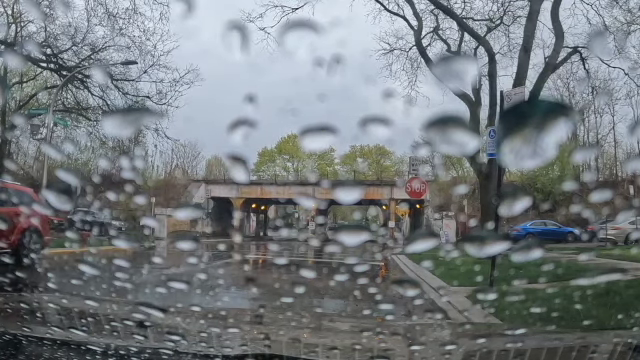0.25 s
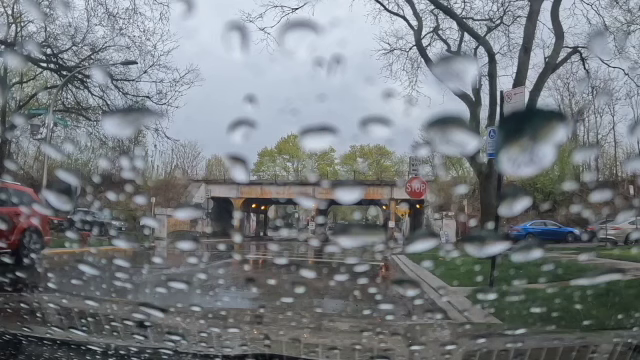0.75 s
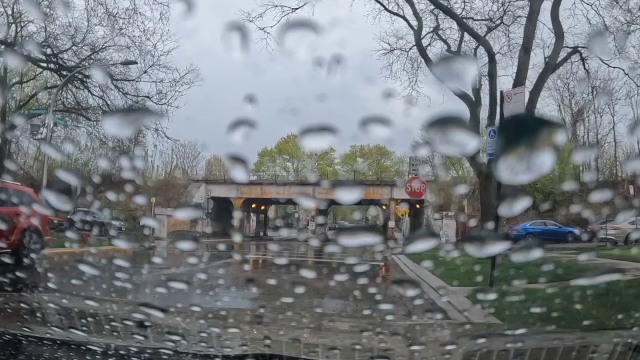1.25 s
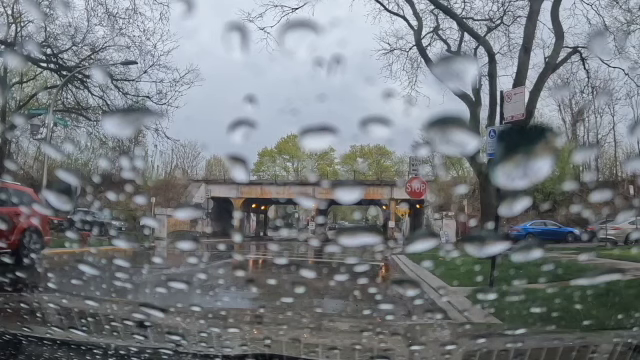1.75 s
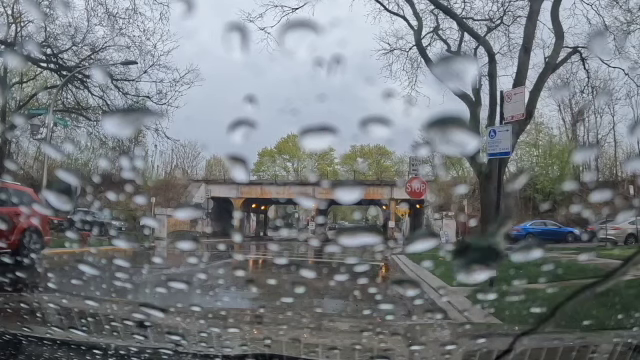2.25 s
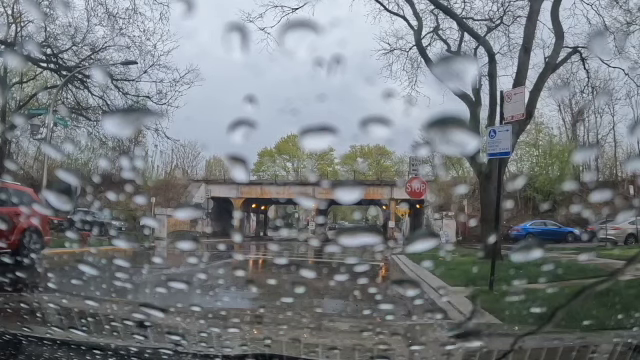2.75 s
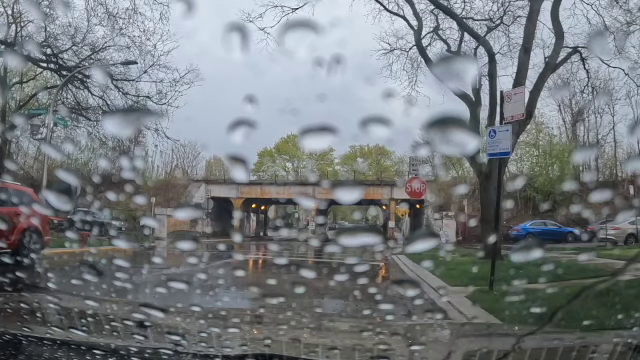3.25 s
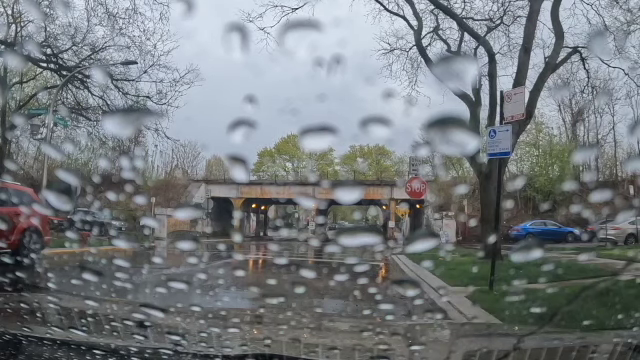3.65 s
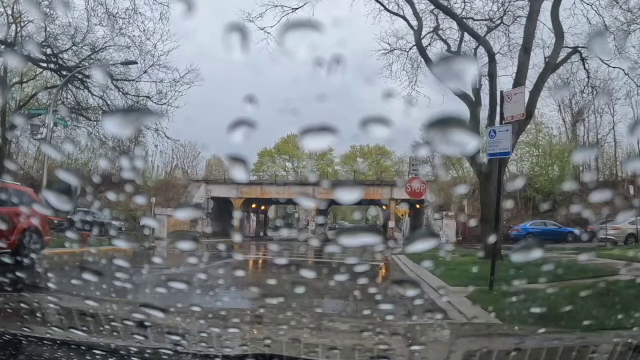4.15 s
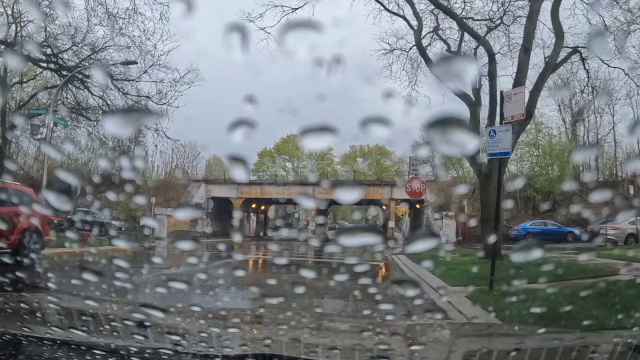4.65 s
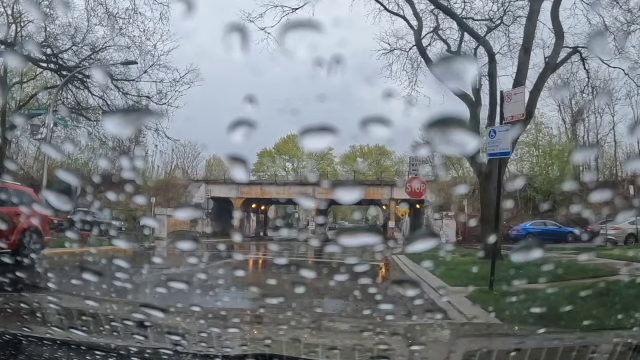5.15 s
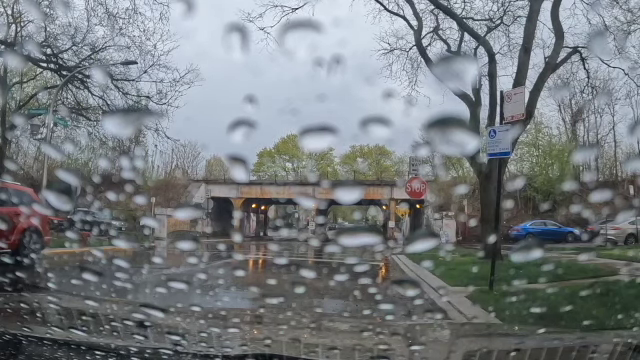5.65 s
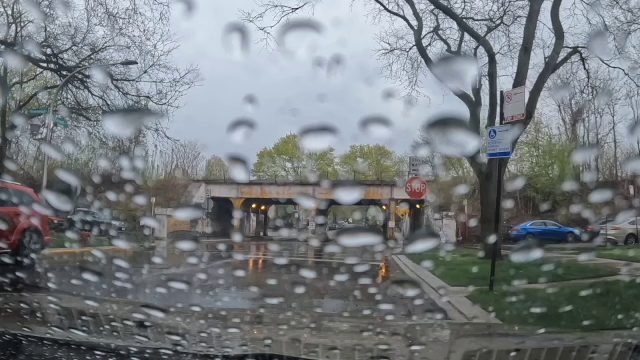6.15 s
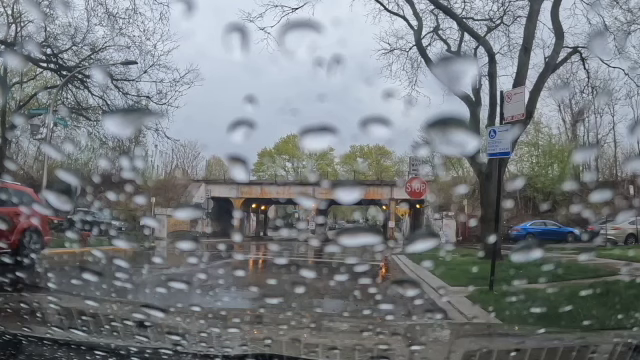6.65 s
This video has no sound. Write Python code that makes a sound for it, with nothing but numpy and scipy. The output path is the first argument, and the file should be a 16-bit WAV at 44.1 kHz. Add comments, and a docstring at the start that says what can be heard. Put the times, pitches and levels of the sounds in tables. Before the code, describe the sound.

Rain patters steadily on a parked car, with separate drops ticking on the windshield and thumping the roof at irregular intervals. A faint hiss of tyres on the wet road fades early. One hard drop hits just after the start and another past the middle, with a few splattering drips and short hollow notes. Distant traffic rumbles throughout, swelling into a brief low boom near the end. A stereo microphone pair listens inside the closed cabin.

```python
"""Rain on a parked car, from a stereo microphone pair inside the closed cabin. From the start the far street
rumbles, small drops merge into a patter and a passing car's tyre hiss fades, gone within two seconds.
Heavy drops soon thump the roof sheet overhead, knock the glass and tick as they burst; the hardest dent
the roof. Big drips from a tree splatter over some hundredths of a second, and a few hollow notes sound.
Near the end the cabin air booms once on a low note. The microphones hiss faintly throughout."""
import sys
import numpy as np
from scipy import signal
from scipy.fft import rfft, irfft, next_fast_len
from scipy.io import wavfile
from scipy.ndimage import uniform_filter1d, map_coordinates

SR = 44100
rng = np.random.default_rng(int(sys.argv[2]) if len(sys.argv) > 2 else 0)


def store_wav(level_fs):
    """Save 16-bit WAV to argv[1]."""
    pcm = np.round(np.clip(np.atleast_2d(level_fs), -1, 1) * 32767)
    wavfile.write(sys.argv[1], SR, pcm.T.astype(np.int16))


N = 305172


def amp(db):
    return 10 ** (np.asarray(db) / 20)

def curves(rows):
    """One value per sample for each column after the time."""
    times, *columns = np.transpose(rows)
    return [np.interp(np.arange(N) / SR, times, column) for column in columns]

def wobble(per_s):
    """A smooth random curve with per_s knots a second."""
    return map_coordinates(rng.standard_normal(int(N * per_s / SR) + 4), [np.arange(N) * per_s / SR])

def filtered(x, response):
    """x shaped by a complex response of frequency."""
    size = next_fast_len(N + SR // 2)
    return irfft(rfft(x, size) * response(np.fft.rfftfreq(size, 1 / SR)), size)[..., :N]

def resonant(modes, skirt):
    """Resonances under one wide band-pass that steepens the skirts; white noise keeps its rms."""
    low, high = modes[0][0] / skirt, modes[-1][0] * skirt

    def response(f):
        peaks = sum((-1) ** k * amp(db) * 1j * f * width / (hz * hz - f * f + 1j * f * width)
                    for k, (hz, width, db) in enumerate(modes))
        peaks = peaks / (1 + 1j * f / high) ** 2 / (1 + low / (1j * f + 1e-9)) ** 2
        return peaks / np.sqrt(np.mean(np.abs(peaks) ** 2))
    return response

def noise_pair(modes, skirt):
    """Two unrelated noises through the same resonances."""
    return filtered(rng.standard_normal((2, N)), resonant(modes, skirt))

def steadied(x, seconds):
    """Noise held near rms 1 over a short span."""
    return x / np.sqrt(np.abs(uniform_filter1d(x * x, int(seconds * SR))) + 0.029)

def ring(start, db, pan_db, hz, cycles=24, rise_s=.0003):
    """Sines that lose 60 dB over the given cycles, each reaching one microphone just before the other."""
    start, db, pan_db, hz = [np.asarray(v)[:, None] for v in (start, db, pan_db, hz)]
    lag_s = .00008 * rng.standard_normal(start.shape)
    samples = np.arange(SR // 64)
    t = samples / SR
    index = (np.round(start * SR).astype(int) + samples).ravel()
    fade = (1 - np.exp(-t / rise_s)) * amp(db - 60 * t * hz / cycles)
    waves = [fade * amp(side * pan_db / 2) * np.sin(2 * np.pi * hz * (t + side * lag_s))
             for side in (1, -1)]
    return np.array([np.bincount(index, wave.ravel(), N + SR)[:N] for wave in waves])


# Bass resonances in the cabin: (pitch [Hz], width [Hz], level [dB])
DEEP_MODES, BOOM_MODES = [(21.3, 18.4, 0.5), (38.4, 16.7, -1)], [(63.1, 17, -1.5), (74.8, 22.2, -9)]
# The far street through closed doors: (time [s], deep rumble [dB], cabin boom [dB])
STREET_LEVELS = [(0, -36.5, -41.5), (.7, -37, -39), (1.3, -35.5, -45.5), (2.2, -37, -39), (2.8, -34, -41.5),
                 (3.3, -39, -43), (3.7, -38.5, -40.5), (4.2, -36.5, -41.5), (4.5, -36.5, -42.5),
                 (5.2, -39.5, -40.5), (6.35, -36.5, -44.5), (6.59, -29.5, -38.5), (6.7, -39, -42.5),
                 (6.79, -36.5, -48.5), (6.92, -37.5, -36)]
def street_rumble(surge_db=2.5):
    """Far traffic reaches the cabin as heaving bass, nearly alike at both microphones."""
    deep_db, boom_db = [db + surge_db * wobble(per_s=7.9) for db in curves(STREET_LEVELS)]
    deep, deep_side = noise_pair(DEEP_MODES, skirt=0.62)
    boom, boom_side = noise_pair(BOOM_MODES, skirt=1.0)
    mid = amp(deep_db) * steadied(deep, 0.163) + amp(boom_db) * steadied(boom, 0.16)
    side = amp(-71.5) * deep_side + amp(-81.0) * boom_side
    return mid + side * [[1], [-1]]

# The microphones' noise floor: (centre [Hz], width [Hz], level [dB])
HISS_BANDS = [(7040, 4100, -2.5), (10300, 2200, -8)]
def microphone_hiss():
    """Each microphone adds its own smooth hiss, unrelated to the other's."""
    return amp(-82.5) * noise_pair(HISS_BANDS, skirt=1.3)

# Tyres on the wet road outside: (centre [Hz], width [Hz], level [dB])
TYRE_BANDS = [(1400, 920, 0), (2400, 1440, -0.5), (4500, 3000, -6.5), (8600, 5800, -16)]
# The car drawing away: (time [s], level [dB])
TYRE_LEVELS = [(0, -60.5), (.15, -62.5), (.6, -62), (.9, -66.5), (1.3, -70), (1.8, -95), (6.92, -96)]
def passing_tyres():
    """Tyres hiss on the wet road and fade with distance, partly alike at the two microphones."""
    shared, apart = noise_pair(TYRE_BANDS, skirt=1.8)
    return amp(curves(TYRE_LEVELS)[0]) * np.array([shared + 0.78 * apart, 0.92 * (shared - 0.66 * apart)])

def patter(count, size_db, colour_db, pan_db, flurry_db):
    """Blow power of small drops all over the car: most faint, each with its own colour and place."""
    draw, chance = rng.random((count, 2)), rng.standard_normal((count, 6))
    at = (draw[:, 0] * N).astype(int)
    size = amp(-2 * size_db * np.log(1 - .98 * draw[:, 1]))
    colours, pan = 2 * colour_db * chance[:, :5].T, pan_db * chance[:, 5]
    blows = np.array([[np.bincount(at, size * amp(colour + side * pan), N) for side in (1, -1)]
                      for colour in colours])
    return blows * amp(2 * flurry_db * wobble(per_s=12))

def panel(heavy, fine, level_db, voicing, modes, decay, skirt, wash):
    """Blows shake a panel close to the microphones: one push, a quick shudder, then the cabin's tail."""
    rise, t60, tail_t60, likeness = decay
    tail_db, push_db, lean_db = voicing
    t = np.arange(SR // 4) / SR
    shape = (1 - np.exp(-t / rise)) ** 2 * (amp(-120 * t / t60) + amp(2 * tail_db - 120 * t / tail_t60))
    shape = shape / shape.max()
    patter_power = amp(2 * level_db) * amp([[lean_db], [-lean_db]])
    blows = heavy + patter_power * (1 - wash) * fine / (fine.mean() * (shape.sum() + amp(2 * push_db)))
    power = np.abs(signal.oaconvolve(blows, shape[None], axes=1)[:, :N])
    power += patter_power * wash  # the share too far and too dense to show single drops
    turn = np.arccos(likeness) / 2
    mid, side = rng.standard_normal((2, N)) * [[np.cos(turn)], [np.sin(turn)]]
    shudder = np.sqrt(power) * [mid + side, mid - side]
    return filtered(shudder + amp(push_db) * np.sqrt(blows), resonant(modes, skirt))

# A drop's five parts are its click, the roof overhead, the glass, its spray and the body shell.
# Their resonances: (pitch [Hz], width [Hz], level [dB])
CLICK_MODES = [(2207, 780, 0), (3120, 1220, 2), (3980, 1280, -2.5)]
ROOF_MODES = [(310.6, 75, 1), (454, 102, 0.5), (595, 140, -2.5), (811, 380, -9.5)]
GLASS_MODES = [(947, 85, 2.5), (1305, 327, 1.5), (1890, 510, -3.5)]
SPRAY_MODES = [(4160, 1330, 0.5), (5230, 1500, 3), (7480, 1500, -6), (9960, 1400, -13), (12300, 3700, -26)]
SHELL_MODES = [(120, 42.7, -5.5), (196.7, 30.5, 1), (281.4, 70, -7.5)]
# How each dies away: (rise [s], blow t60 [s], cabin tail t60 [s], left-right likeness [0-1])
CLICK_DECAY = (.0003, .007, .08, .5)
ROOF_DECAY = (.0008, .05, .18, .82)
GLASS_DECAY = (.0004, .02, .1, .58)
SPRAY_DECAY = (.0007, .009, .07, .5)
SHELL_DECAY = (.002, .1, .22, .985)
# Each part at the microphones: (cabin tail [dB], first push [dB], left-right [dB])
PART_VOICING = [(-15, -8, 3.5), (-5, 23, 2), (-7.5, 10.5, 3), (-17, -9, 2), (16, 27.5, 1.65)]
# The knocks follow a heavy drop's click: (click [s], roof [s], glass [s], spray [s], shell [s])
PART_LAGS = (0, .0015, .0008, 0, .0015)
# The patter from inside the cabin: (time [s], glass [dB], clicks [dB], spray [dB])
PATTER_LEVELS = [(0, -56.5, -59, -71), (.15, -61, -61, -71.5), (.3, -59.5, -63, -70), (.6, -59, -63, -70.5),
                 (1.08, -62, -65.5, -72.5), (1.7, -60.5, -64, -71), (1.95, -60.5, -64, -70.5),
                 (2.3, -60.5, -64.5, -73.5), (2.75, -59, -62.5, -69.5), (3.1, -61, -65.5, -73.5),
                 (3.35, -60, -62.5, -70.5), (3.5, -61.5, -67, -74), (3.95, -61, -65, -73),
                 (4.27, -63, -68, -76.5), (4.38, -60.5, -68.5, -75.5), (4.43, -57, -64, -72),
                 (4.52, -60, -65, -73.5), (4.98, -63, -68.5, -75.5), (5.28, -59.5, -63.5, -71),
                 (5.48, -63, -69.5, -78), (5.95, -61.5, -67.5, -77.5), (6.25, -62, -65.5, -71.5),
                 (6.6, -58.5, -65, -72), (6.78, -65.5, -72.5, -76), (6.92, -59.5, -60.5, -78)]
def rain_on_car(heavy_blows):
    """The patter and the heavy blows sound through the same five parts."""
    heavy = [np.roll(part, round(lag * SR), axis=1)[:, :N] for part, lag in zip(heavy_blows, PART_LAGS)]
    fine = patter(count=2200, size_db=2.8, colour_db=3.5, pan_db=2.5, flurry_db=0.6)
    glass_db, click_db, spray_db = curves(PATTER_LEVELS)
    levels_db = [click_db, glass_db - 0.5, glass_db, spray_db, glass_db + 8.5]
    click, roof, glass, spray, shell = zip(heavy, fine, levels_db, PART_VOICING)
    return (panel(*click, CLICK_MODES, CLICK_DECAY, skirt=1.5, wash=.4)
            + panel(*roof, ROOF_MODES, ROOF_DECAY, skirt=1.4, wash=.45)
            + panel(*glass, GLASS_MODES, GLASS_DECAY, skirt=1.5, wash=.5)
            + panel(*spray, SPRAY_MODES, SPRAY_DECAY, skirt=1.3, wash=.45)
            + panel(*shell, SHELL_MODES, SHELL_DECAY, skirt=1.4, wash=.8))

def small_pings(count=500, centre_hz=3350, fall_db_per_octave=12):
    """Rows for ring(): small drops ring the glass on pitches of their own, the high ones more weakly."""
    draw, chance = rng.random((count, 2)), rng.standard_normal((count, 2))
    start = draw[:, 0] * (N - 1) / SR
    click_db = curves(PATTER_LEVELS)[1][(start * SR).astype(int)]
    size_db = -np.log(1 - .98 * draw[:, 1])
    octaves = 0.528 * chance[:, 1]
    db = click_db + size_db - fall_db_per_octave * np.maximum(octaves, 0)
    return np.transpose([start, db, 3 * chance[:, 0], centre_hz * 2 ** octaves])

def blow_power(click_db, roof_db, glass_db, spray_db, pan_db):
    """One drop's power per part and microphone; the body shell thumps along with the roof."""
    parts_db = click_db + np.array([0, roof_db, glass_db, spray_db, roof_db - 2.5])
    return amp(2 * parts_db)[:, None] * amp([pan_db, -pan_db])

# The clearest single drops, close by: (time [s], click [dB], roof [dB re click], glass [dB re click],
# spray [dB re click], left-right [dB], ping [Hz])
HEAVY_DROPS = [(0.311, -51, -19, -6, -5, 0, 3500), (0.3528, -36, -5, -8, -6.5, -0.5, 3570),
               (0.5598, -54, -10, -3, -2, -3, 4840), (0.626, -51, -0.5, -2, -15, 1, 4520),
               (0.7826, -48, -9, -8, -13, 2, 1830), (1.0762, -49.5, -12, -11, -15, 1, 3100),
               (1.655, -65, -7, -10, -14, 0, 2240), (1.667, -64, -15, -9, -8, 0, 1770),
               (1.778, -57, -15, -8, -2, 1, 2500), (1.803, -59, 1, -6, -1, 3, 1530),
               (1.838, -57, -15, -8, -5, 1, 4000), (1.844, -57, -15, -6, -12, 1, 3000),
               (1.911, -55, -15, -4, -4, 1, 5300), (1.918, -56, -15, -4, -6, 1, 4500),
               (1.958, -59, -15, -6, -11, 0, 3000), (2.075, -57, -15, -1, -10, 1, 2500),
               (2.2164, -59, -15, -6, -13, 0, 1900), (2.425, -61, -13, -6, -8, 1, 3000),
               (2.451, -62, -15, -6, -9, 2, 3000), (2.556, -57, -15, -6, -11, 1, 4000),
               (2.641, -55, -15, -6, -12, 3, 3500), (2.662, -59, -15, -4, -15, 1, 2500),
               (2.861, -56, -15, -8, -8, 1, 4000), (3.119, -59, -17, -6, -12, 1, 2980),
               (3.248, -57, -11, -9, -10, 1, 3000), (3.407, -57, -15, -6, -9, 0, 3000),
               (3.829, -60, -15, -10, -9, 1, 4000), (3.839, -62, -15, -7, -6, 1, 3000),
               (3.886, -55, -15, -8, -6, 1, 4500), (3.929, -56, -15, -8, -10, 1, 4300),
               (4.004, -59, -15, -6, -4, -1, 6000), (4.048, -57, -15, 0, -10, 1, 3500),
               (4.223, -64, -15, -4, -11, 2, 3000), (4.696, -58, -18, -8, -12, -2, 3000),
               (5.727, -61, -15, -6, -7, 4, 3000), (6.071, -62, -13, -6, -9, 0, 3000),
               (6.512, -61, -15, -6, -11, 0, 3000), (6.705, -60, -15, -9, -8, -1, 3000),
               (1.8175, -50, -9, -8, -9, 2, 3080), (1.8871, -51, -8, -4, -9, 2, 2760),
               (2.127, -50, -4, -1.5, -3.5, 4, 3100), (2.263, -50.5, -10, -3, -6, -2, 2820),
               (2.3456, -48.5, -8, -1, -5, 0, 1920), (2.375, -55, -13, -2, -5, 6, 5080),
               (2.529, -57, -1, -4, -24, 0, 1510), (2.592, -49, -24, 0, -5, -2, 3870),
               (2.6229, -52, -3, 3, -7, 1, 5900), (2.653, -56, -16, -10, -9, 2, 1500),
               (2.691, -49.5, -19, 1, -3, 0, 7040), (2.742, -66, -10, -8, -9, 0, 1680),
               (2.757, -52.5, -21, -18, -14, 0, 3360), (2.774, -57, -13, -12, -11, 0, 4010),
               (2.825, -48, -8, -2, -6, 0, 1500), (2.9107, -53, -10, -9, -8, -2, 2580),
               (3.053, -46, -19, -4, -11, 5, 4020), (3.158, -55, -5, -5, -8, 1, 2580),
               (3.2145, -68, -14, -11, -27, -4, 3000), (3.3312, -53.5, -4.5, -0.5, -7, 0, 2420),
               (3.3955, -54, -5, -6, -24, 1, 2020), (3.586, -47.5, -7.5, -1, -12, 0, 1770),
               (3.635, -60, -8, -4, -21, 0, 2780), (3.6812, -58, -7, 2, -9, 0, 4090),
               (3.727, -55, -7, -3, -6, 5, 4660), (3.861, -54, -13, -16, -4, 0, 5660),
               (3.95, -52, -22, -2, -9, 2, 1980), (3.985, -51, -7, -19, -5, -2, 3500),
               (4.0877, -54.5, -23, -2, -9, -0.5, 2700), (4.1192, -55.5, -24, -13, -8, -2, 2950),
               (4.393, -58, -10, -6, -11, -3, 3490), (4.402, -55.5, -10, 1, -22, 0, 2450),
               (4.4472, -60, -10, 9, -1, -5, 1510), (4.4664, -49, -15, -4, -8, -2, 3860),
               (4.497, -57, 0, -11, -7, -2, 2860), (4.5433, -49, -8, -4, -3, 2.5, 3300),
               (4.573, -45, -9, -5, -11, 1, 4050), (4.6465, -60, -13, -2, 0, 1, 1510),
               (4.7697, -50, -5, -2, -7, 1, 5200), (4.7846, -56, -19, -13, -1, 2, 4370),
               (4.804, -44.5, -11, -3.5, -12, 1, 4010), (4.8414, -33.5, -5.5, -5, -11.5, 3, 4200),
               (4.9077, -53.5, -2, -10, -17, -2, 2660), (5.204, -53.5, -11, -1, -4, 0, 3140),
               (5.2275, -50.5, -8, 2.5, -2, 2, 3700), (5.281, -52.5, -5, -2, -11, 3, 2200),
               (5.34, -50.5, -7, -15, -9, 3, 4870), (5.395, -51, -9, -4.5, -14, -1, 3010),
               (5.591, -51, -4, -5, -12, 4, 3340), (5.658, -50.5, 3.5, -11, -20, 0, 4100),
               (5.763, -57.5, -18, -8, -7, 0, 2750), (5.8592, -53, 0.5, -14, -7, -2, 5770),
               (5.8863, -52.5, -0.5, -5, -4, -1, 2830), (6.095, -56.5, -0.5, -2, -10, -3, 1790),
               (6.122, -69, 19, 10, 11, 3, 13200), (6.1368, -46, -10, -5, -3, 4, 3300),
               (6.2288, -48.5, -21, -22, -11, -1, 3020), (6.247, -46, -11, -5, -9, 2, 4870),
               (6.3335, -58.5, -6, -14, -9, 2, 2500), (6.3586, -48.5, -12, -18, -20, -1, 3180),
               (6.404, -60, -14, -8, -15, 6, 2780), (6.4288, -50, -18, -7, -27, -1, 3230),
               (6.563, -50, -1, -3, -2, 0, 1500), (6.599, -58.5, 7, -1, -4, -1, 1570),
               (6.746, -59, -10, 1.5, -9, -1, 3000), (6.8193, -60, -7, -7, -2, -1, 3360),
               (6.834, -54, -9, 0, -15, 2, 2800), (6.879, -57, -4, 1, -13, -5, 2580),
               (6.904, -57, -14, 3, 1, -4, 7900)]
def heavy_drops():
    """Each heavy drop lands as one blow on all five parts."""
    blows = np.zeros((5, 2, N + SR))
    for start, *drop, _ in HEAVY_DROPS:
        blows[:, :, round(start * SR)] += blow_power(*drop)
    return blows

def drop_pings(above_click_db=9.5):
    """Rows for ring(): the glass rings briefly where a heavy drop lands."""
    return [(start, db + above_click_db, pan_db, hz) for start, db, *_, pan_db, hz in HEAVY_DROPS]

# The roof overhead denting under the hardest drops: (time [s], level [dB], pitch [Hz])
ROOF_DENTS = [(0.3543, -18, 680), (0.3608, -28, 220), (0.974, -33, 700), (1.3395, -28, 1100),
              (4.8428, -38, 700)]
def roof_dents():
    """The dented sheet snaps back within a few cycles."""
    start, db, hz = np.transpose(ROOF_DENTS)
    return -ring(start, db, np.zeros_like(start), hz, cycles=6, rise_s=0.00024)

# Drips from the tree above: (time [s], droplet click [dB], roof [dB re click], glass [dB re click],
# spray [dB re click], left-right [dB], splatter [s], first tap [dB re droplet], ping [dB re click],
# ping [Hz])
TREE_DRIPS = [(0.464, -76, 16.5, 14, -8, 1, 0.011, 8, 5, 1500),
              (0.971, -51, 0, 0, -10, 1.5, 0.0057, 8, 7, 3630),
              (1.013, -69.5, 7.5, 10, -8, 1, 0.0065, 7.2, 5, 1190),
              (1.33, -49.5, 2.5, 4, -7, 1.4, 0.01, 1, 11, 1330),
              (5.61, -54.5, 3.5, 4, -7.5, 1.2, 0.013, 0.5, 7.8, 1730),
              (6.1782, -58, -16, -20, 8.5, 2, 0.011, 1, 18, 4750)]
def tree_drips(swell_s=0.019, droplets_per_s=1600):
    """A drip lands with one blow, then breaks into a swelling and dying run of droplets."""
    blows, t = np.zeros((5, 2, N + SR)), np.arange(SR // 8) / SR
    for start, *drop, splatter_s, tap_db, _, _ in TREE_DRIPS:
        run = (1.2 - np.exp(-t / swell_s)) * np.exp(-t / splatter_s)
        droplets = (rng.random(len(t)) < droplets_per_s / SR) * rng.exponential(size=len(t)) * run
        droplets[0] = amp(2 * tap_db)
        at = round(start * SR)
        blows[:, :, at:at + len(t)] += blow_power(*drop)[..., None] * droplets
    return blows

def drip_pings(count=14, scatter_octaves=0.19):
    """Rows for ring(): a drip's droplets ring the glass around one pitch, the late ones more weakly."""
    rows = []
    for start, click_db, *_, pan_db, splatter_s, _, ping_db, hz in TREE_DRIPS:
        late, spread = rng.exponential(size=count), rng.standard_normal((count, 2))
        times = start + 1.5 * splatter_s * late
        levels_db = click_db + ping_db + 3 * spread[:, 0] - 3 * late
        pitches = hz * 2 ** (scatter_octaves * spread[:, 1])
        rows.extend(zip(times, levels_db, [pan_db] * count, pitches))
    return rows

# Hollow notes in the cabin: (time [s], level [dB], pitch [Hz], left-right [dB])
HOLLOW_NOTES = [(0.721, -41.5, 504, 5), (1.352, -35, 190, 0), (5.624, -37.5, 480, 1), (5.648, -41, 520, 1)]
def hollow_notes(rise_s=0.0047, t60_s=0.12):
    """Short damped notes, perhaps a body panel ringing on after a heavy drop."""
    out, t = np.zeros((2, N + SR)), np.arange(SR // 4) / SR
    for start, db, hz, pan_db in HOLLOW_NOTES:
        note = (1 - np.exp(-t / rise_s)) * amp(db - 60 * t / t60_s) * np.sin(2 * np.pi * hz * t)
        at = round(start * SR)
        out[:, at:at + len(t)] += note * amp([[pan_db / 2], [-pan_db / 2]])
    return out[:, :N]

# The air booming around the microphones: (start [s], end [s], peak rms level [dB], pitch [Hz])
CABIN_SWELL = (6.5, 6.74, -29.5, 61)
def cabin_swell():
    """One smooth rise and fall of the cabin's low note."""
    start, end, db, hz = CABIN_SWELL
    t = np.arange(N) / SR
    arch = np.sin(np.pi * np.clip((t - start) / (end - start), 0, 1))
    return amp(db) * np.sqrt(2) * arch * np.sin(2 * np.pi * hz * t)

def scene():
    """Rain on the car close around the microphones, the street beyond."""
    rain = rain_on_car(heavy_drops() + tree_drips())
    glass_pings = ring(*np.vstack([small_pings(), drip_pings(), drop_pings()]).T)
    close = rain + glass_pings + roof_dents() + hollow_notes()
    return close + street_rumble() + cabin_swell() + microphone_hiss() + passing_tyres()

# Stereo width of the pair: (frequency [Hz], left-minus-right gain [dB])
PAIR_WIDTH = [(100, 1), (300, -2), (700, 2), (1500, 0), (3500, 0), (5300, -4.5), (8000, 0), (14000, 1)]
# Response of both microphones: (frequency [Hz], gain [dB])
PAIR_RESPONSE = [(20, 0.5), (5000, 0.5), (9000, -1.5), (14000, -1.5)]
# Balance between them: (frequency [Hz], left-right [dB])
PAIR_BALANCE = [(20, 0), (4000, -1.5), (8000, 1), (14000, 4.5)]
def record(dry, top_hz=14200):
    """The pair in the cabin: width varies with pitch, the top leans left and ends at the band limit."""
    def along(points, f):
        hz, db = np.transpose(points)
        return np.interp(np.log(f + 1), np.log(hz), db)

    def response(f):
        return amp(along(PAIR_RESPONSE, f) + along(PAIR_BALANCE, f) * [[.5], [-.5]]) * (f < top_hz)
    mid = (dry[0] + dry[1]) / 2
    side = filtered((dry[0] - dry[1]) / 2, lambda f: amp(along(PAIR_WIDTH, f)))
    return filtered(np.array([mid + side, mid - side]), response)


dry = scene()
out = record(dry)
store_wav(out)
```